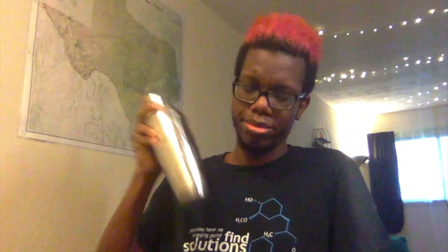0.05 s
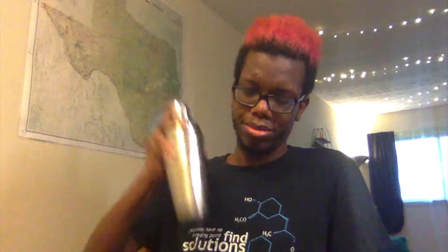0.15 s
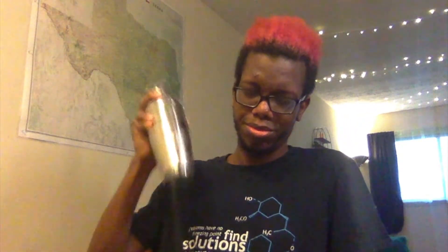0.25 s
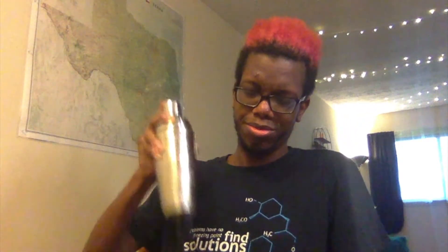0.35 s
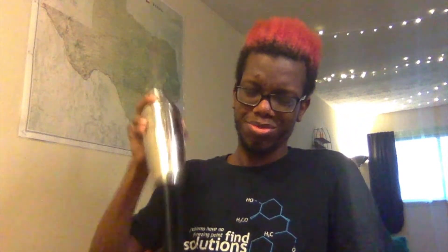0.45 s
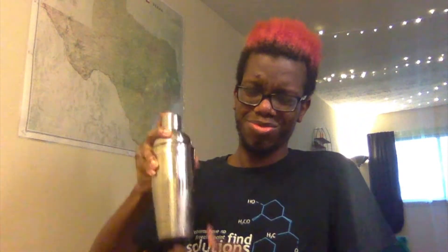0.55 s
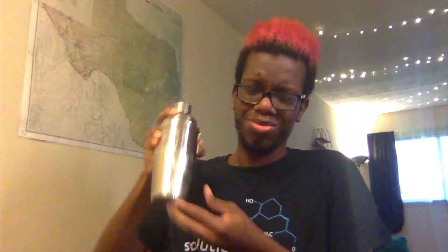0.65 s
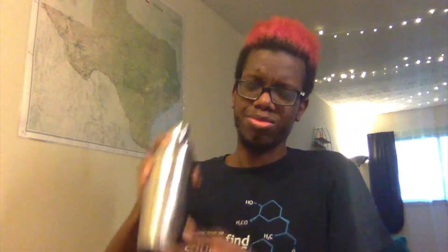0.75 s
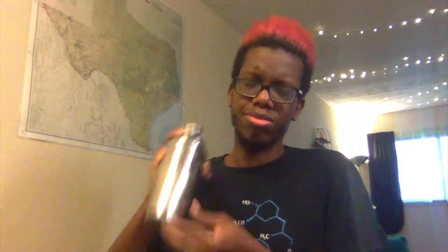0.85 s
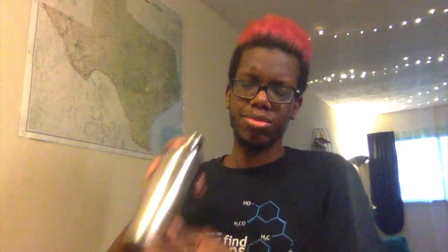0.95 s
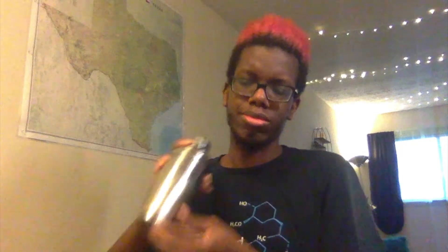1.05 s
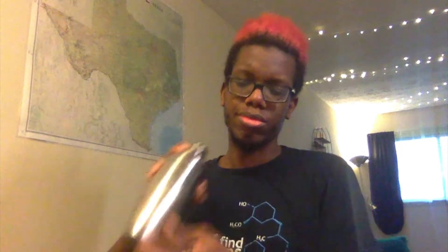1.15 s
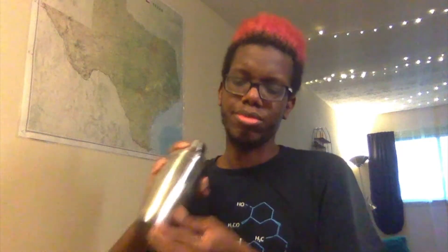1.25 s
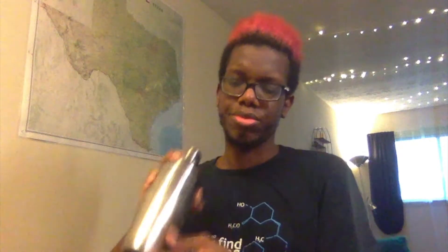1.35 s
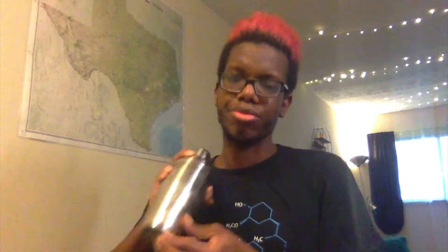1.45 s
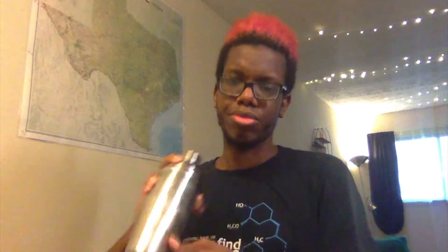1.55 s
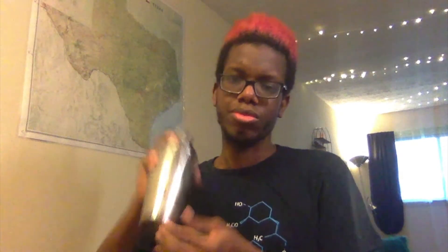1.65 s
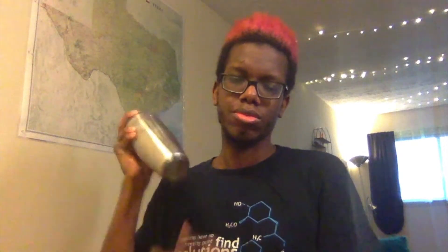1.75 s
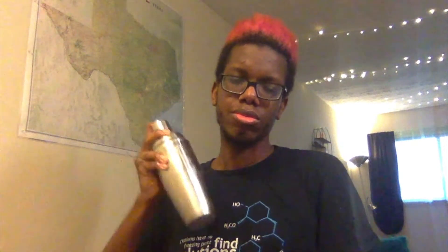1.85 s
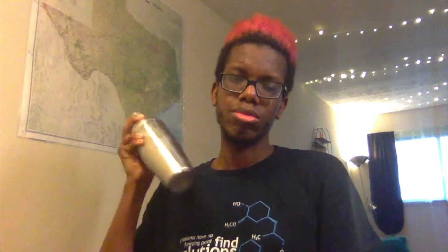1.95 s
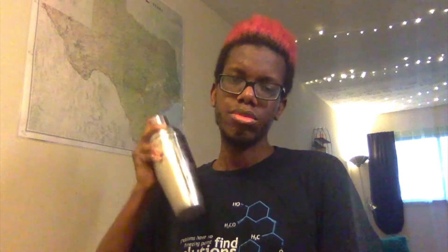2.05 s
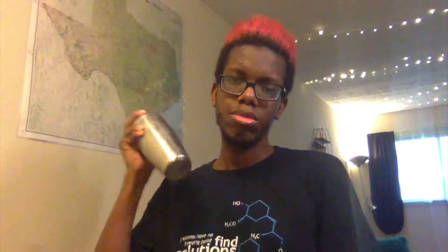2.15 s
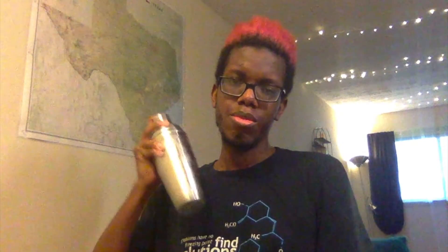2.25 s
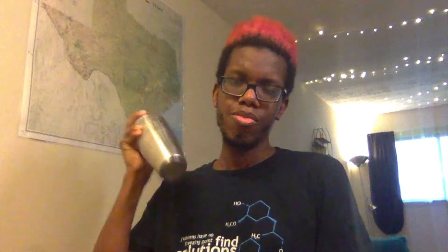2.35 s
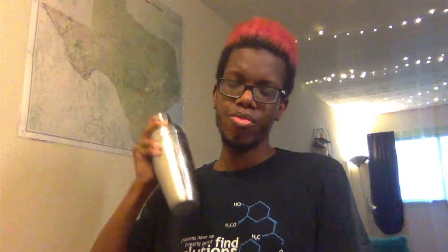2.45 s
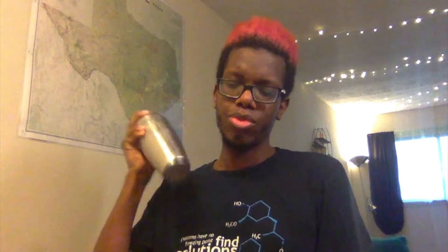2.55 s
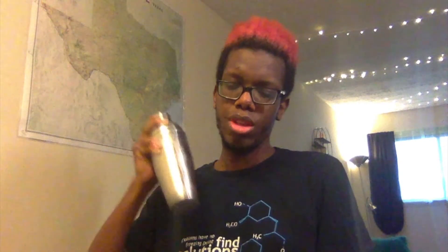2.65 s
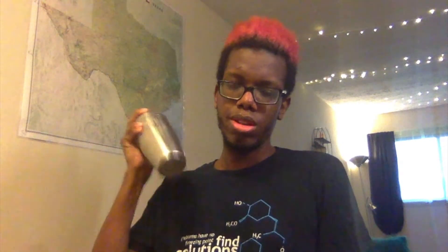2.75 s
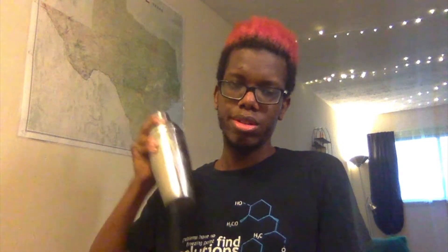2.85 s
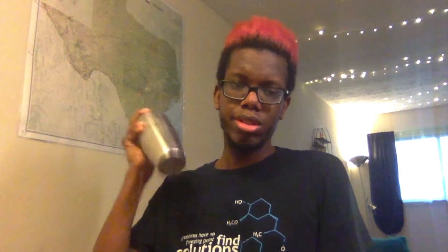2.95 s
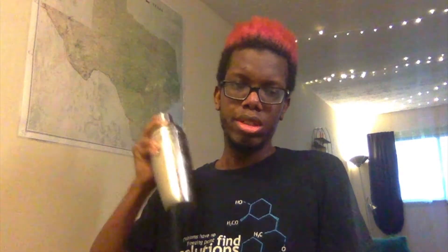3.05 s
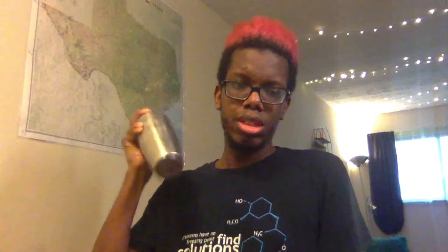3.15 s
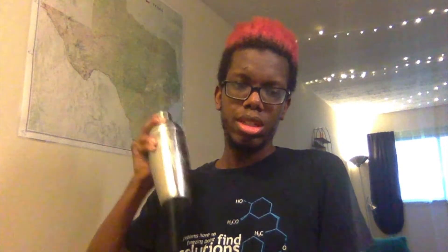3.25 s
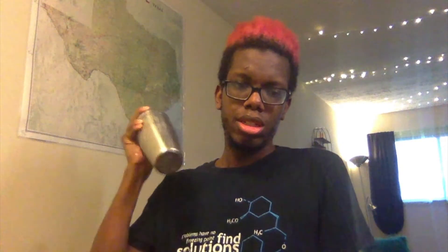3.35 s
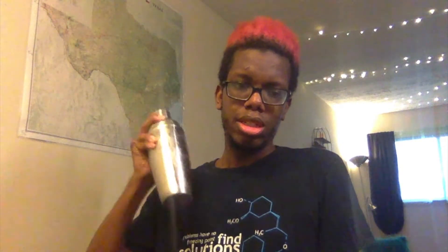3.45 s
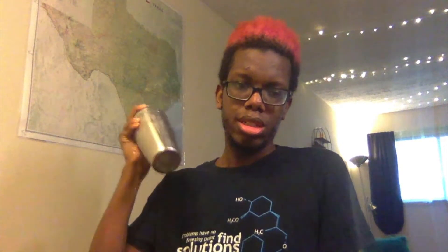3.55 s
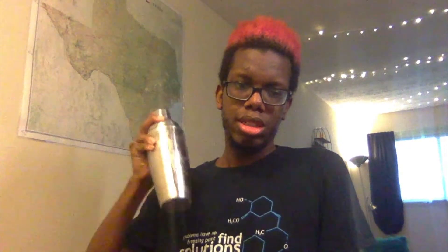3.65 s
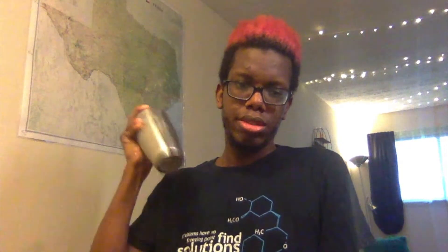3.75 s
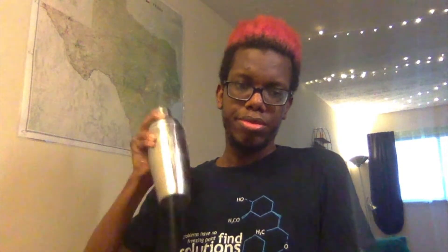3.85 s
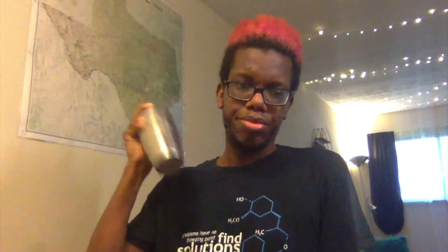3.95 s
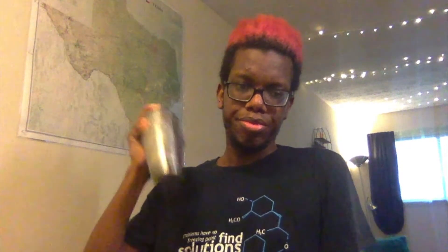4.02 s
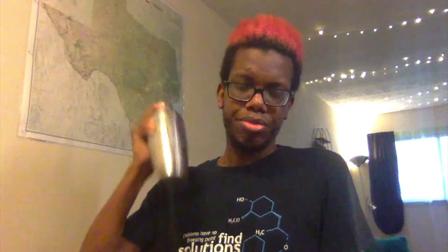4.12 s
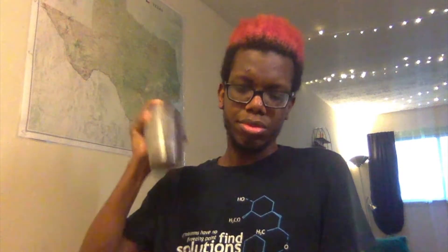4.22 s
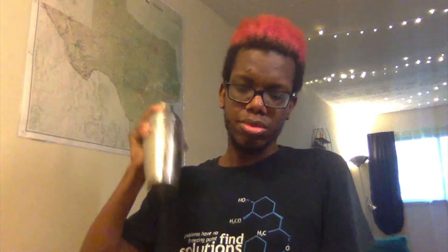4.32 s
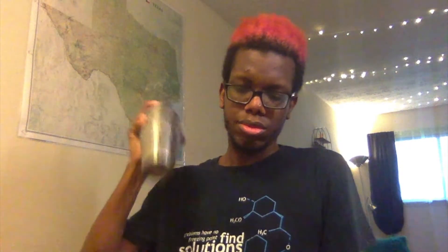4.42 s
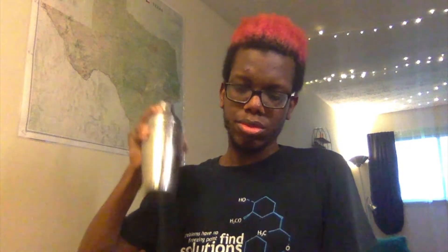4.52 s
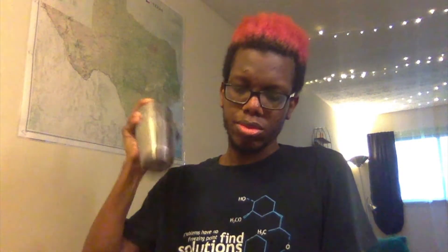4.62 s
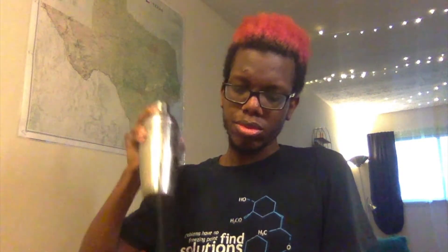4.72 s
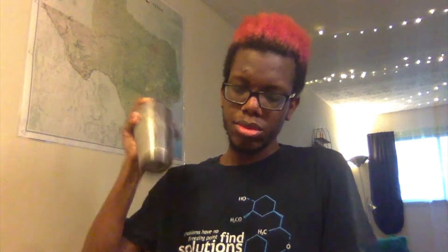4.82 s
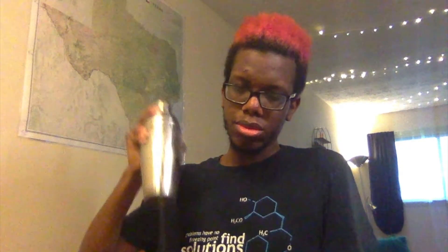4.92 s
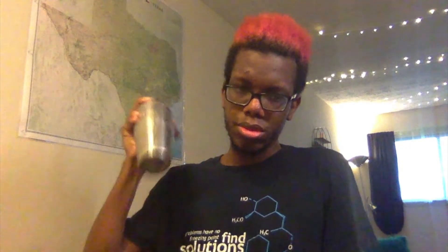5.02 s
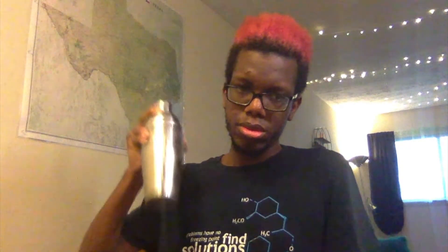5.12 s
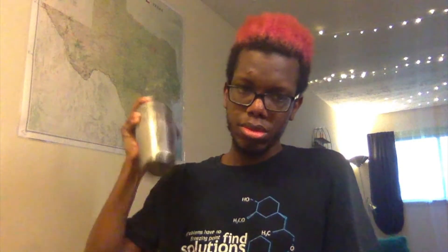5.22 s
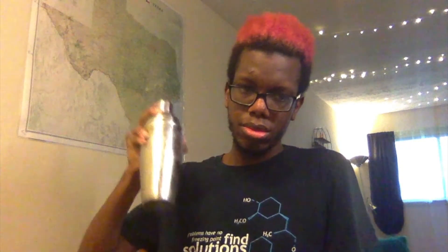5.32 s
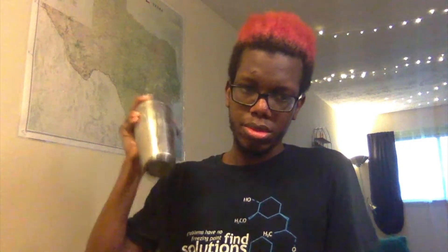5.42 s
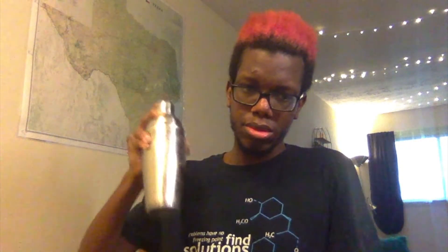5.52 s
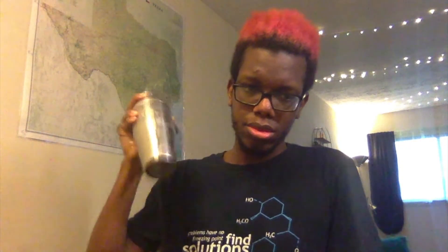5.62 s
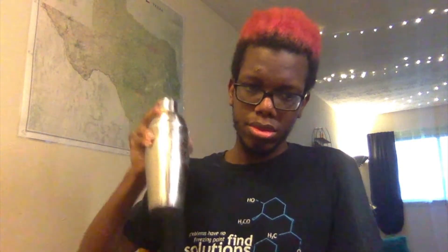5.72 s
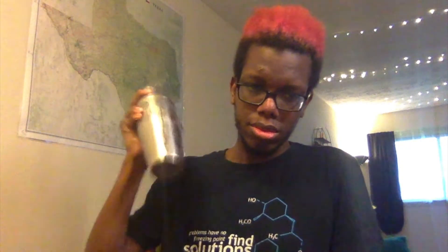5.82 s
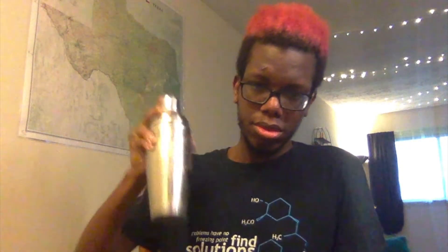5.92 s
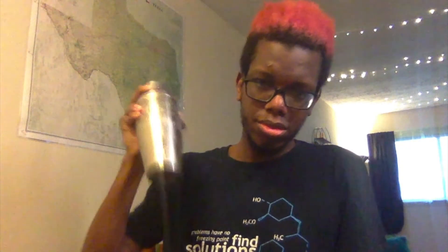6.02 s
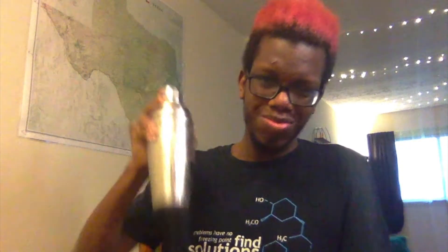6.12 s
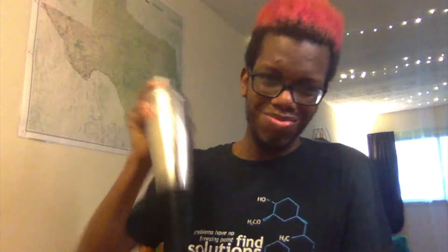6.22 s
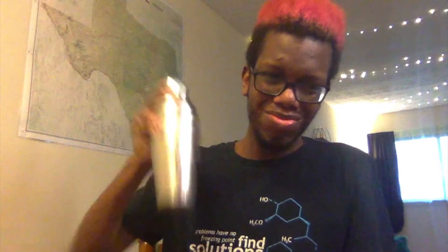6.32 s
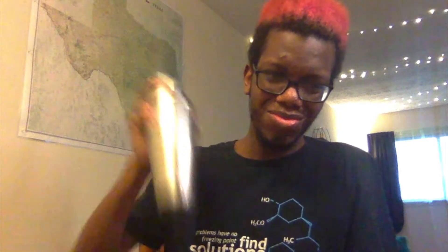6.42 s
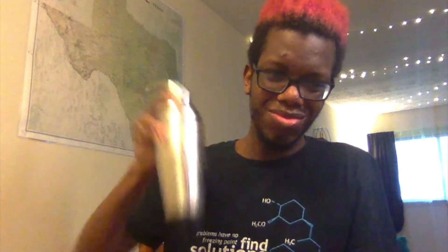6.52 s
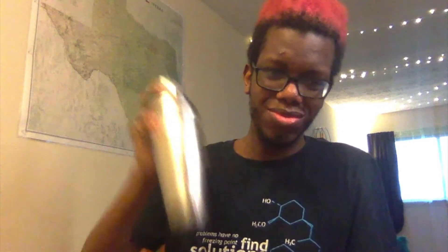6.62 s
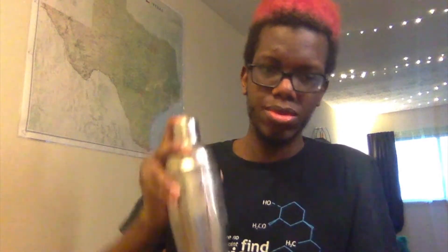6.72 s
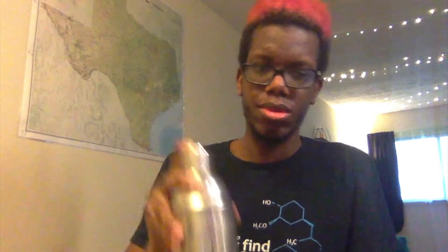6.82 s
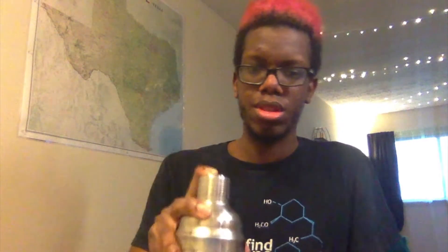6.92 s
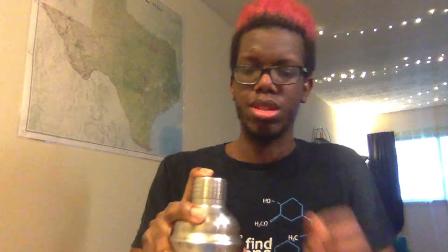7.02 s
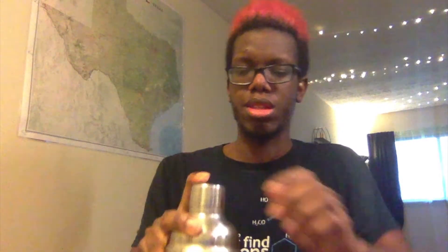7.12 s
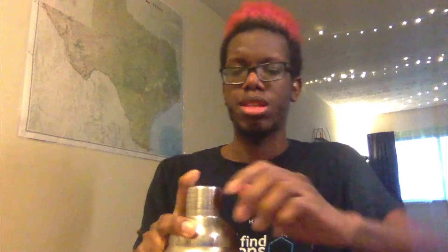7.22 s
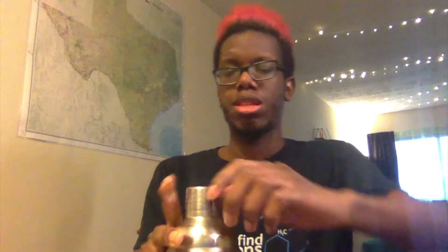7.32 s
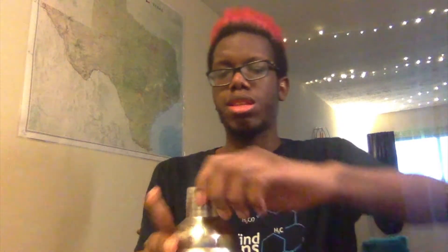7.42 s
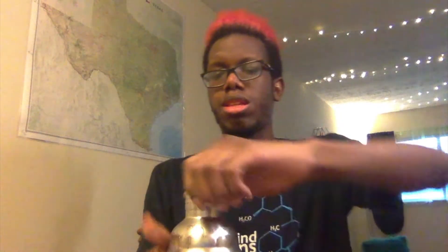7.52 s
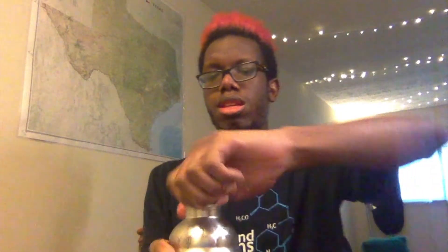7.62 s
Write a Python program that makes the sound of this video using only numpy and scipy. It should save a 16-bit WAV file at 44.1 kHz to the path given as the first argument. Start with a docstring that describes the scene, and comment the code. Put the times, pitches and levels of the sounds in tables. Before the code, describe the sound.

Ice cubes rattle hard and fast in a steel cocktail shaker in a small room, then the shaker thumps down on a table.

```python
"""Ice in a cocktail shaker

Ice is shaken hard in a steel shaker, about five throws a second, in a small room with a faint low hush.
On each throw the load crashes into one end: streams of tiny rings for cubes, chips and drink swell and die.
Big cubes add a short wall note, damped by hand and drink, with clacks, pings and cracks; wet ice scrapes.
The ice settles, fingers tick on the cap (short rings), and the base lands on a table (low ringing modes).
"""
import sys
import numpy as np
from scipy import signal
from scipy.fft import rfft, irfft
from scipy.io import wavfile
from scipy.ndimage import uniform_filter1d

SR = 44100
rng = np.random.default_rng(int(sys.argv[2]) if len(sys.argv) > 2 else 0)


def unload_wav(signal):
    """Save mono or channel-first audio to the path in sys.argv[1] as 16-bit WAV at rate SR, clipped to [-1, 1]."""
    wavfile.write(
        sys.argv[1],
        SR,
        np.round(np.clip(np.atleast_2d(signal).T, -1, 1) * 32767).astype(np.int16),
    )


N = 338202
TIME = np.arange(N) / SR  # s
AGE = np.arange(SR // 2) / SR  # s since a contact
HIT_SAMPLES = 441  # the level of a hit is its rms over this many samples (10 ms)
SHAKE_HZ = 4.9  # throws per second
SWING_DB = 22  # a crash rises by this much in its gathering time and falls as much in its settling time
CHIP_PACE, DRINK_PACE = (1.18, 1.145), (1.41, 1.3)  # times quicker than the cubes to (gather, settle)
CLACK_LOW_HZ, CLACK_HIGH_HZ = 2620, 4160  # clacks of the lesser cubes
PING_LOW_HZ, PING_HIGH_HZ = 6480, 14250  # pings of every cube
STRAY_PER_S, STRAY_END_S = 50, 6.9  # how often lesser cubes hit, and until when
STRAY_DB, STRAY_CLACK_DB, STRAY_EDGE_DB = -4.5, 0, -3.5  # lesser cubes, against the load around them
STRAY_T60_S = .013  # their wall note dies quickly
HUSH_DB = -61.5
EDGE_HZ = 16100  # top of the recorder's band

# All levels in the tables are relative: each sound's own gain comes on top. A t60 is the time to fall 60 dB.
# The room's background, its colour: f/Hz, level/dB
HUSH_COLOUR = [(25, -17), (60, -21.5), (130, 1.5), (210, 8.5), (400, 0.5), (700, -12.5), (1800, -19),
               (3500, -29.5), (8000, -33), (16000, -42.5)]
# The load crashes into one end: t/s, gathering time of the cubes/s, settling time of the cubes/s,
# cube clatter level/dB, chip fizz level/dB, drink thud level/dB
CRASHES = [(.04, 0.12, 0.39, -30.5, -34.5, -48), (.13, 0.089, 0.1, -24, -30, -38),
           (.243, 0.058, 0.053, -25, -30.5, -40), (0.324, 0.061, 0.21, -23.5, -31, -40.5),
           (0.524, 0.068, .14, -22.5, -30.5, -36.5), (0.767, 0.058, 0.1, -22.5, -31, -37),
           (0.986, 0.047, 0.078, -20, -27, -36), (1.104, .02, 0.17, -31, -33, -58),
           (1.196, 0.038, 0.11, -22.5, -30, -35.5), (1.369, 0.067, 0.052, -24, -34.5, -32.5),
           (1.586, 0.19, 0.088, -25.5, -40.5, -42.5), (1.753, 0.029, 0.063, -20.5, -25.5, -40),
           (1.853, 0.1, 0.059, -25, -30, -34), (1.966, 0.013, 0.068, -29, -29, -40),
           (2.02, 0.15, 0.22, -26, -42, -50.5), (2.15, 0.038, 0.13, -26.5, -32.5, -67),
           (2.26, 0.12, 0.079, -22.5, -35.5, -40.5), (2.43, 0.067, 0.076, -22.5, -34, -43),
           (2.546, 0.032, 0.023, -19, -26.5, -40), (2.619, 0.036, 0.092, -20, -30.5, -35.5),
           (2.844, 0.13, 0.084, -28.5, -44, -44.5), (2.944, 0.033, 0.075, -24.5, -31, -58),
           (3.06, 0.099, 0.044, -24.5, -50, -43.5), (3.22, 0.1, 0.088, -23.5, -35, -34.5),
           (3.351, 0.041, 0.08, -30, -46, -54), (3.448, 0.088, 0.083, -21.5, -32.5, -43.5),
           (3.63, 0.024, 0.074, -18, -29.5, -34.5), (3.774, 0.042, 0.037, -29.5, -31.5, -54),
           (3.866, 0.087, 0.062, -23, -30, -41.5), (4.015, 0.017, 0.077, -28, -44, -43),
           (4.081, 0.075, 0.032, -20.5, -33.5, -44.5), (4.227, 0.072, 0.072, -31, -30.5, -58),
           (4.291, 0.059, 0.05, -30, -39, -42.5), (4.421, 0.13, 0.16, -31, -41, -48),
           (4.619, .01, 0.038, -40, -38, -69), (4.692, 0.041, 0.066, -25, -37.5, -35.5),
           (4.813, 0.018, 0.028, -35, -35, -68), (4.88, 0.023, 0.062, -24, -30, -31.5),
           (5.105, 0.067, 0.046, -27.5, -34, -38.5), (5.182, 0.016, 0.061, -36.5, -51, -59),
           (5.25, 0.018, 0.16, -33, -42, -40), (5.462, 0.12, 0.092, -35.5, -36, -53),
           (5.512, 0.028, 0.024, -22, -32.5, -30), (5.612, 0.011, 0.07, -28, -28.5, -49),
           (5.717, 0.094, 0.067, -26.5, -34, -34), (5.868, 0.031, 0.13, -34, -37, -35.5),
           (6.076, 0.17, 0.14, -30.5, -37.5, -44), (6.196, .015, 0.042, -39, -38, -65),
           (6.251, 0.026, 0.086, -23, -28.5, -35), (6.41, 0.074, .07, -32, -35, -64),
           (6.461, 0.028, 0.055, -21.5, -38, -29.5), (6.595, 0.088, .1, -39.5, -45, -63),
           (6.636, 0.026, .08, -34, -49, -42), (6.715, 0.082, .16, -41, -55, -38.5),
           (6.825, .02, .16, -47.5, -71.5, -63.5)]
# Colour of the small cubes: f/Hz, level/dB
CUBE_COLOUR = [(450, -33.5), (680, -8.5), (850, 4.5), (1050, 2), (1300, 3), (1700, 0.5), (2100, 2),
               (2550, -5.5), (3300, -1), (4500, -11.5), (6500, -36.5), (10000, -29)]
# Colour of the ice chips: f/Hz, level/dB
CHIP_COLOUR = [(2000, -17), (4000, 1), (6300, 2.5), (8000, -1), (11000, -7.5), (14000, -7.5), (16000, -7.5)]
# Colour of the drink: f/Hz, level/dB
DRINK_COLOUR = [(30, -25), (70, -9), (130, -13.5), (220, -5.5), (420, 4.5), (600, -0.5), (900, 9),
                (2000, -62)]
# Ice sliding along the wall between throws: t/s, level/dB
SLIDE_LEVEL = [(0, -52), (.6, -36.5), (1.3, -35), (2.0, -42), (2.7, -33), (3.4, -31.5), (3.601, -62),
               (4.201, -62.5), (5.0, -39.5), (5.6, -55.5), (6.3, -55), (6.7, -46.5), (6.95, -83)]
# Colour of the sliding ice: f/Hz, level/dB
SLIDE_COLOUR = [(500, -27.5), (850, -5.5), (1150, -7), (1450, 0.5), (1800, 3), (2100, -3.5), (2500, -24.5),
                (3300, -23.5), (5000, -26.5), (9000, -46.5)]
# Big cubes that stand out: t/s, wall note f/Hz, its t60/s, its level/dB,
# clack f/Hz, clack level/dB, glassy ping level/dB
BIG_CUBES = [(.038, 2180, 0.0068, -28, 3770, -25.5, -28), (.0575, 2140, 0.023, -22, 3050, -26, -45),
             (.1277, 1090, 0.014, -20.5, 3750, -34, -29), (.2262, 2200, .005, -36, 4500, -26, -34),
             (.2447, 1390, 0.0044, -25, 3200, -23, -47), (.3053, 1440, 0.0038, -21.5, 3500, -31, -35),
             (.3164, 2040, 0.0048, -21, 3200, -23, -29), (.4357, 1930, .014, -30, 3800, -31.5, -28.5),
             (.506, 1015, 0.026, -20.5, 3650, -27.5, -33), (.6734, 1870, 0.017, -36, 3010, -40, -52),
             (.7292, 1090, 0.0054, -26.5, 3670, -27, -33), (.8999, 2000, .006, -39, 2970, -33.5, -37.5),
             (.968, 1060, .006, -29, 4800, -31, -37), (1.0891, 2170, 0.0027, -22, 2560, -42, -29),
             (1.1935, 1920, 0.0073, -24, 5020, -26, -38), (1.2915, 2000, 0.0079, -30.5, 3500, -49, -42),
             (1.3267, 1030, 0.022, -29.5, 3460, -25, -42), (1.4812, 1990, 0.011, -27, 3680, -46, -58),
             (1.5198, 1050, 0.0093, -27.5, 5000, -32, -34.5),
             (1.5788, 1070, 0.0025, -25.5, 3160, -33.5, -30.5), (1.7467, 1990, 0.0076, -22, 3080, -21, -38),
             (1.757, 1370, 0.011, -26, 3950, -31, -29), (1.814, 970, 0.0049, -27, 3220, -20.5, -25),
             (1.8428, 1920, 0.0046, -23.5, 3410, -20.5, -30), (1.9576, 2010, 0.023, -22, 4150, -25, -27.5),
             (2.0029, 1960, 0.014, -26.5, 3650, -28.5, -35), (2.036, 900, 0.022, -25, 3840, -40, -32),
             (2.1403, 2050, 0.013, -22, 5000, -28, -31), (2.2179, 900, 0.0074, -28, 3040, -27, -26),
             (2.2432, 2090, .008, -23.5, 3250, -50, -32), (2.3949, 990, 0.011, -33, 3820, -25.5, -39),
             (2.5456, 2080, 0.0079, -18.5, 2630, -24, -41), (2.5565, 1390, 0.09, -21.5, 3000, -26.5, -53),
             (2.6003, 1430, .006, -31, 2870, -27, -36), (2.6528, 1570, 0.0086, -29, 2780, -30, -36),
             (2.8023, 2180, .006, -25, 3020, -26.5, -31), (2.8354, 2040, 0.0035, -22, 2640, -50, -28),
             (2.9373, 2040, 0.018, -22.5, 3790, -26.5, -33.5), (3.0071, 1020, 0.021, -25, 3110, -51, -34),
             (3.057, 2060, .008, -26, 3520, -47, -36.5), (3.1472, 1930, 0.014, -30.5, 4710, -31.5, -38),
             (3.3507, 1380, 0.013, -30, 2720, -38, -50), (3.3654, 930, 0.012, -41, 4800, -33, -41),
             (3.403, 1960, .018, -32, 4320, -29, -38), (3.425, 1320, 0.017, -25.5, 5130, -30.5, -48),
             (3.4465, 2070, 0.008, -25, 2820, -36, -41), (3.4613, 2120, 0.012, -21.5, 3100, -44, -32),
             (3.6217, 2040, 0.0039, -26.5, 2780, -30, -40), (3.7668, 2100, 0.018, -23.5, 5800, -27, -43),
             (3.9143, 2090, 0.016, -28.5, 3270, -36, -39.5), (4.0, 1040, 0.024, -23.5, 6000, -56, -35.5),
             (4.0676, 2140, 0.0048, -26.5, 2560, -46, -33), (4.1758, 1900, 0.029, -32.5, 3120, -57, -42),
             (4.2234, 1044, 0.038, -15.5, 4100, -35, -31), (4.2449, 1060, .014, -35, 3900, -28, -40),
             (4.2877, 970, 0.011, -34, 3050, -28.5, -49), (4.2974, 1050, 0.0077, -28.5, 3080, -27.5, -34.5),
             (4.3935, 2050, .006, -45, 4570, -32, -34), (4.4206, 1016, .019, -28.5, 4860, -34, -35),
             (4.5576, 2080, 0.035, -30, 2610, -60, -53), (4.6178, 2290, .006, -57, 3000, -28, -43),
             (4.6564, 1500, 0.01, -21, 4420, -30, -30), (4.869, 895, 0.014, -29.5, 6100, -36, -27.5),
             (4.8933, 1310, 0.016, -26.5, 3550, -31, -39), (4.912, 2100, 0.023, -28.5, 3250, -33, -43),
             (4.9816, 1090, 0.041, -35, 2990, -48, -43), (5.0401, 993, .032, -21, 3670, -34, -60),
             (5.246, 815, 0.021, -28.5, 3750, -31, -33.5), (5.4061, 1300, 0.0094, -36.5, 4470, -29, -28),
             (5.4569, 1100, 0.0094, -27, 2810, -26.5, -40), (5.6386, 1800, .006, -45, 3040, -23.5, -34),
             (5.6766, 1460, 0.025, -20, 3910, -27.5, -36), (5.7091, 1010, 0.0072, -36, 3380, -22.5, -29),
             (5.783, 2310, 0.0041, -36, 4500, -32.5, -32), (5.818, 1220, 0.012, -38, 3160, -25.5, -34.5),
             (5.8619, 1083, 0.015, -23.5, 6300, -31.5, -28), (5.9108, 960, 0.0077, -39, 2800, -34, -29.5),
             (6.03, 940, 0.02, -31.5, 4160, -29.5, -32.5), (6.0684, 2070, .006, -40, 2900, -26.5, -36),
             (6.099, 1010, .006, -31.5, 2920, -30.5, -32.5), (6.1811, 2280, 0.0097, -31, 4520, -25, -33),
             (6.1876, 2140, 0.031, -25, 4350, -24, -32), (6.224, 974, .015, -23, 4100, -27, -27),
             (6.272, 1000, 0.0079, -25, 3180, -35, -32), (6.366, 2070, 0.034, -26.5, 4360, -25, -25),
             (6.3816, 1390, 0.021, -27.5, 3000, -20, -46), (6.409, 2120, .006, -41, 2900, -21, -28),
             (6.4249, 1020, 0.037, -17, 3900, -32, -21.5), (6.468, 2080, .006, -27, 3540, -37, -23),
             (6.5778, 2070, 0.017, -37.5, 4550, -26.5, -36), (6.61, 2010, .011, -41, 3470, -29.5, -60),
             (6.6408, 810, 0.02, -28.5, 2520, -31, -42), (6.7097, 1720, .017, -27.5, 3600, -33, -65),
             (6.7412, 1810, 0.012, -35, 2840, -49, -60), (6.7798, 1530, 0.016, -42, 3070, -44, -60)]
# Notes that the lesser cubes draw from the wall, before a chance detuning: f/Hz
WALL_NOTES = (1020, 2060, 2030, 1500)
# Colour of a corner of ice breaking off: f/Hz, level/dB
SNAP_COLOUR = [(3000, -21), (6000, -4.5), (9000, -3.5), (12000, -1.5), (16000, 1)]
# Lingering rings of the shaker, before the drink shifts them: f/Hz, level/dB, t60/s
SHAKER_RINGS = [(744, 2.5, 0.2), (944, -19, 0.76), (939, -13.5, 0.042), (1206, -4, 0.067), (1890, -8, 0.1),
                (2020, -12.5, 0.15), (1800, -16.5, 0.079), (2100, 0, .11), (3093, -1.5, 0.043),
                (4030, -6, 0.026), (6730, -11.5, 0.14), (13975, -5.5, .06)]
# Fingers tick on the cap: t/s, level/dB, ring f/Hz, t60/s
CAP_TICKS = [(7.0038, -56, 3850, 0.0034), (7.015, -57, 2710, 0.0055), (7.439, -71.5, 1718, 0.0095),
             (7.4652, -52.5, 1836, 0.012), (7.506, -55, 3250, 0.0096), (7.634, -52, 1840, 0.029)]
# Colour of a soft fingertip: f/Hz, level/dB
FINGER_COLOUR = [(400, -17), (1000, -2.5), (1800, 6.5), (3500, -7), (5000, -8.5), (7000, -24), (12000, -32)]
# The shaker meets the table: t/s, thump level/dB, rap level/dB, contact time/s
KNOCKS = [(7.0736, -14.5, -17, 0.00037), (7.0869, -29, -32, 0.0015), (7.102, -24.5, -27.5, 0.0012),
          (7.1765, -20, -31.5, 0.0014), (7.2267, -20.5, -71, 0.0092), (7.26, -33.5, -46, 0.0029)]
# Notes (modes) of the table: f/Hz, level/dB, t60/s
TABLE_MODES = [(76.2, -20, .3), (135.6, -7.5, 0.31), (166.4, 3, 0.094), (180.4, -2, 0.16),
               (252, -1.5, 0.12), (341, -3.5, 0.078), (350, -3.5, 0.17), (404, -3, 0.17),
               (429, -1.5, 0.049), (494, -26, 0.0776), (786, -7.5, 0.063), (1106, -5, 0.021),
               (1340, -10.5, 0.036)]
# Colour of the rap of base on table: f/Hz, level/dB
RAP_COLOUR = [(150, -6), (400, 10.5), (620, -4), (1200, -2), (1800, -10.5), (3000, -16.5), (4500, -26),
              (7500, -36), (10000, -41), (14000, -36), (16000, -78)]
# How long the room's reflections last: f/Hz, t60/s
ROOM_T60 = [(200, 0.2), (700, 0.14), (2000, 0.23), (5000, 0.14), (9000, 0.1), (16000, 0.14)]


def amp(db):
    """Turns decibels into gain."""
    return 10 ** (np.asarray(db) / 20)


def unit(x):
    """Scales a sound to an energy of one."""
    return x / np.sqrt(np.sum(x ** 2) + 1e-20)


def read(points, hz):
    """Reads a table between its points, on a log-frequency axis."""
    f, value = np.transpose(points)
    return np.interp(np.log(hz + 1), np.log(f + 1), value)


def add(mix, s, sound):
    """Mixes a sound in at time s."""
    part = mix[round(s * SR):][:len(sound)]
    part += sound[:len(part)]


def fade(t60, size):
    """Dies away exponentially, 60 dB down after t60."""
    return np.exp(-np.log(1000) * AGE[:size] / max(t60, 1e-4))


def ring(hz, t60, size):
    """One struck mode: a sine that dies away."""
    return np.sin(2 * np.pi * hz * AGE[:size]) * fade(t60, size)


def colour(points, size=2048):
    """A filter with the given spectrum, its energy packed as early as possible (minimum phase)."""
    hz = abs(np.fft.fftfreq(size, 1 / SR))
    log_gain = np.log(amp(read(points, hz)))
    spectrum = np.exp(np.conj(signal.hilbert(log_gain)))
    return unit(np.fft.ifft(spectrum).real[:size // 2])


def highpass(x, hz):
    """A small body radiates little bass (second-order Butterworth)."""
    k = np.tan(np.pi * min(hz, SR * .45) / SR)
    feedback = [1 + np.sqrt(2) * k + k * k, 2 * (k * k - 1), 1 - np.sqrt(2) * k + k * k]
    return signal.lfilter([1, -2, 1], feedback, x)


def burst(body, t60, size=2048):
    """A crushing contact: a dying puff of noise through a body."""
    puff = rng.standard_normal(size) * fade(t60, size)
    return unit(irfft(rfft(puff, 2 * size) * rfft(body, 2 * size))[:size])


def moving(x, responses):
    """Sound takes each of several paths in turn, two per throw, each blending into the next."""
    out = np.zeros(N)
    for k, response in enumerate(responses):
        away = (TIME * SHAKE_HZ * 2 - k + 1) % len(responses) - 1
        share = np.cos(np.pi / 2 * np.minimum(abs(away), 1))
        out += signal.oaconvolve(x * share, response)[:N]
    return out


def hush():
    """Faint low background of the room: coloured noise."""
    noise = rng.standard_normal(N)
    return amp(HUSH_DB) * signal.oaconvolve(noise, colour(HUSH_COLOUR, size=8192))[:N]


def tail(first_s=0.0034):
    """Scattered reflections from near walls, each band dying at its own speed."""
    taps = rng.choice([-1., 1.], len(AGE))
    taps = taps * (rng.random(len(AGE)) < 3000 / SR) * (AGE > first_s)  # about 3000 reflections a second
    hz, t, bands = signal.stft(taps, SR, nperseg=256)
    decay = np.exp(-np.log(1000) * t / read(ROOM_T60, hz)[:, None])
    return unit(signal.istft(bands * decay, SR, nperseg=256)[1])


def room(x, wet_db, count=5):
    """Direct sound plus the reflections of the room, moving through several patterns."""
    return x + amp(wet_db) * moving(x, [tail() for _ in range(count)])


def load(column, pace=(1, 1)):
    """Level of one part of the load: each crash swells as the ice gathers and dies as it settles."""
    t, power = TIME[::32], 0
    for s, gather_s, settle_s, *levels in CRASHES:
        before = pace[0] * (s - t) / max(gather_s, 1e-3)
        after = pace[1] * (t - s) / max(settle_s, 1e-3)
        away = np.maximum(before, after)
        power = power + amp(levels[column] - SWING_DB * np.minimum(away, 10)) ** 2
    return np.interp(TIME, t, np.sqrt(power))


def collisions(per_s, spread_db, low_hz, high_hz, cycles, grit, count=32, size=1024):
    """A stream of small contacts; each place on the wall has its own short ring with some noise (grit)."""
    at = np.flatnonzero(rng.random(N) < per_s / SR)
    heights = amp(spread_db * np.minimum(rng.exponential(1, N), 3)) * rng.choice([-1, 1], N)
    places = rng.integers(0, count, N)[at]
    pitches = low_hz + (high_hz - low_hz) * (np.arange(count) + rng.random(count)) / count
    grains = []
    for hz in pitches:
        t60 = cycles / hz
        note = unit(highpass(ring(hz, t60, size), hz / 2))
        noise = unit(rng.standard_normal(size) * fade(t60, size))
        grains.append(unit(note + grit * noise))
    sounds = heights[at][:, None] * np.array(grains)[places]
    samples = at[:, None] + np.arange(size)
    return np.bincount(samples.ravel(), sounds.ravel(), N + size)[:N]


def steadied(x, body, span_s):
    """Colours a stream; contacts share the energy of the throw, so each span holds about equal power."""
    x = signal.oaconvolve(x, colour(body))[:N]
    span = int(span_s * SR)
    power = uniform_filter1d(uniform_filter1d(x ** 2, span), span)
    return x / np.sqrt(abs(power) + 0.0091 * np.mean(x ** 2))


def tumble(cubes_db=-4.0, chips_db=-2.5, drink_db=-1):
    """Small cubes, chips and the drink itself hit the end of the shaker on every throw."""
    cubes = collisions(per_s=950, spread_db=4.2, low_hz=700, high_hz=5000, cycles=18, grit=.6, count=96)
    chips = collisions(per_s=900, spread_db=5.2, low_hz=3500, high_hz=15500, cycles=52, grit=.7, count=96)
    drink = collisions(per_s=250, spread_db=5.5, low_hz=172, high_hz=663, cycles=4.9, grit=.7)
    clatter = load(0) * steadied(cubes, CUBE_COLOUR, 0.054)
    fizz = load(1, CHIP_PACE) * steadied(chips, CHIP_COLOUR, 0.016)
    thud = load(2, DRINK_PACE) * steadied(drink, DRINK_COLOUR, 0.088)
    return amp(cubes_db) * clatter + amp(chips_db) * fizz + amp(drink_db) * thud


def slide(level_db=-7.5):
    """Wet cubes scrape the steel and keep its main resonance murmuring."""
    s, db = np.transpose(SLIDE_LEVEL)
    scrapes = collisions(per_s=630, spread_db=9.5, low_hz=820, high_hz=3005, cycles=22, grit=0.51)
    level = amp(np.interp(TIME, s, db, right=-120) + level_db)
    return level * steadied(scrapes, SLIDE_COLOUR, 0.092)


def stray_cubes(detune=0.062, spread_db=-3.5):
    """Lesser cubes hit at chance moments, as loud as the load is then: rows like those of BIG_CUBES."""
    body_db = 20 * np.log10(load(0))
    edge_db = 20 * np.log10(load(1, CHIP_PACE))
    rows = []
    chances = rng.random((int(STRAY_PER_S * STRAY_END_S), 6))
    for k, (when, note, tune, force, edge, lump) in enumerate(chances):
        s = (k + when) / STRAY_PER_S
        now = int(s * SR)
        note_db = body_db[now] + STRAY_DB + spread_db * (2 * force - 1)
        ping_db = edge_db[now] + STRAY_EDGE_DB + spread_db * (2 * edge - 1)
        clack_db = (note_db + ping_db) / 2 + STRAY_CLACK_DB
        hz = WALL_NOTES[int(note * len(WALL_NOTES))] * (1 + detune * (2 * tune - 1))
        clack_hz = CLACK_LOW_HZ + (CLACK_HIGH_HZ - CLACK_LOW_HZ) * lump
        rows.append((s, hz, STRAY_T60_S, note_db, clack_hz, clack_db, ping_db))
    return rows


def clink(hz, t60, others_db, spread, size, count=4):
    """An irregular lump of ice: one strong mode and a few weaker or stronger ones at chance distances."""
    ratios = np.exp(spread * rng.uniform(-1, 1, count))
    weights = rng.standard_normal(count)
    others = sum(w * ring(min(hz * r, SR * .45), t60, size) for r, w in zip(ratios, weights))
    return unit(highpass(unit(ring(hz, t60, size)) + amp(others_db) * unit(others), hz * 0.23))


def chatter(x, again_db, span_s, count=3):
    """A rough cube touches several times in quick succession; the energy is shared."""
    contacts = np.zeros(512)
    contacts[0] = 1
    at = np.clip(span_s * SR * rng.uniform(.15, 1, count), 1, len(contacts) - 1).astype(int)
    contacts[at] = amp(again_db) * rng.choice([-1, 1], count)
    return irfft(rfft(x, 2 * len(x)) * rfft(unit(contacts), 2 * len(x)))[:len(x)]


def blows(cubes, size=2048):
    """Each cube rings the damped wall briefly, clacks, pings and cracks at its corner."""
    out = np.zeros(N)
    wall, chip, splinter = colour(CUBE_COLOUR), colour(CHIP_COLOUR), colour(SNAP_COLOUR)
    for s, hz, t60, note_db, clack_hz, clack_db, ping_db in cubes:
        ping_hz = PING_LOW_HZ + (PING_HIGH_HZ - PING_LOW_HZ) * rng.random() ** 2
        spreading = 1 - fade(0.17 * t60, size)  # the bending wave needs a moment to go round the wall
        note = amp(note_db - 1) * unit(highpass(spreading * ring(hz, t60, size), hz=595))
        clack = amp(clack_db - 2) * clink(clack_hz, t60=0.0105, others_db=2, spread=0.502, size=size)
        ping = amp(ping_db - 7) * clink(ping_hz, t60=0.0052, others_db=-3.0, spread=.5, size=size)
        scatter = amp(note_db - 10) * burst(wall, t60=0.054)  # the many weaker wall modes
        crack = amp(ping_db - 4) * burst(chip, t60=0.11)
        snap = amp(ping_db - 4) * burst(splinter, t60=0.004)
        corner = chatter(ping - clack + crack + snap, again_db=-10.5, span_s=.0018)
        add(out, s, np.sqrt(HIT_SAMPLES) * (note + scatter + corner))
    return out


def shaker(x, ring_db=-28, slosh=.06, count=7):
    """The steel and the air inside ring on faintly; the sloshing drink keeps shifting their notes."""
    responses = []
    for _ in range(count):
        response = 0
        for hz, db, t60 in SHAKER_RINGS:
            shifted_hz = hz * (1 + slosh * rng.uniform(-1.1, 1))
            response = response + amp(db) * unit(ring(shifted_hz, t60, size=8192))  # cut off at 0.19 s
        responses.append(response)
    return x + amp(ring_db) * moving(x, responses)


def ticks(snap_db=-7, snap_t60=.008, size=2048):
    """Light touches of the hand on the steel cap: a short ring and a puff of noise."""
    out, finger = np.zeros(N), colour(FINGER_COLOUR)
    for s, db, hz, t60 in CAP_TICKS:
        touch = unit(ring(hz, t60, size)) + amp(snap_db) * burst(finger, snap_t60)
        add(out, s, amp(db) * np.sqrt(HIT_SAMPLES) * unit(np.convolve(touch, finger)))
    return out


def knocks(rap_t60=0.052, low_cut_hz=100):
    """The base lands on the table, rocks and lands again; softer contacts ring only the low modes."""
    out, rap = np.zeros(N), colour(RAP_COLOUR)
    swell = 1 - fade(0.0097, len(AGE))  # the heavy top takes a moment to move
    table = swell * sum(amp(db) * ring(hz, t60, len(AGE)) for hz, db, t60 in TABLE_MODES)
    for s, thump_db, rap_db, contact_s in KNOCKS:
        push = fade(contact_s, size=1024)
        add(out, s, amp(thump_db) * signal.oaconvolve(table, push / push.sum()))
        softened = np.convolve(rap, fade(contact_s / 2, size=256))  # a softer contact is duller
        crash = burst(softened, rap_t60, size=4096)
        add(out, s, amp(rap_db) * np.sqrt(HIT_SAMPLES) * crash * swell[:len(crash)])
    return highpass(out, low_cut_hz)


def scene():
    """Ice in the shaker, then the cap and the table, all in one room."""
    ice = tumble() + slide() + blows(BIG_CUBES + stray_cubes())
    shaken = room(shaker(ice), wet_db=-7.5)
    table = room(knocks(), wet_db=-8, count=2)
    cap = room(ticks(), wet_db=-12.0, count=2)
    return (shaken + table + cap + hush())[None]


def record(dry):
    """The recorder's band limit: a steep low-pass filter."""
    lowpass = signal.firwin(511, EDGE_HZ, window=("kaiser", 9), fs=SR)
    return signal.oaconvolve(dry, lowpass[None], "same")


dry = scene()
out = record(dry)
unload_wav(out)
```